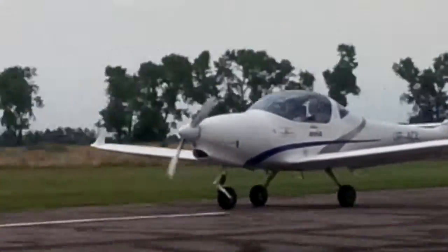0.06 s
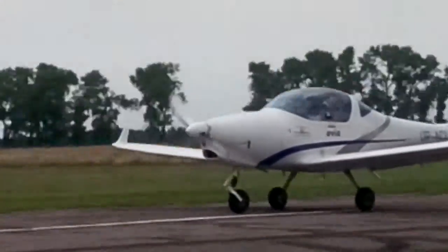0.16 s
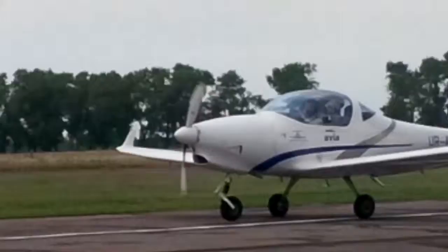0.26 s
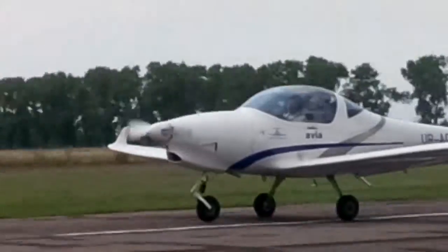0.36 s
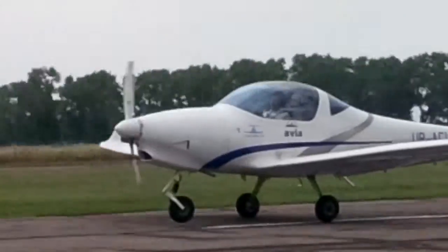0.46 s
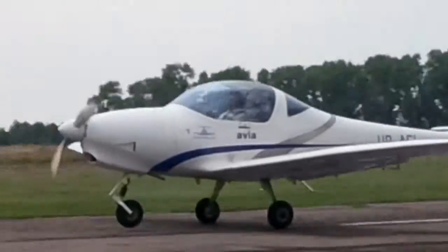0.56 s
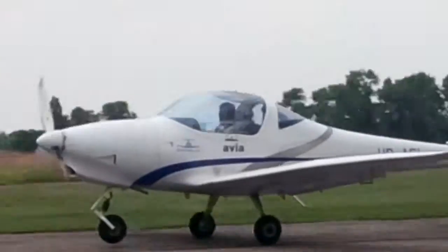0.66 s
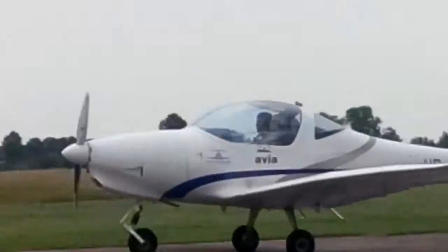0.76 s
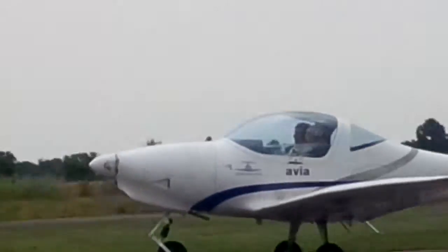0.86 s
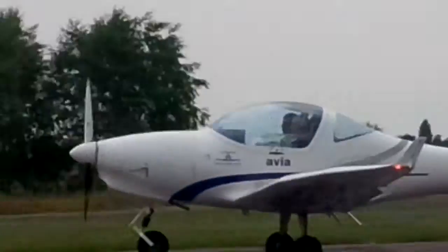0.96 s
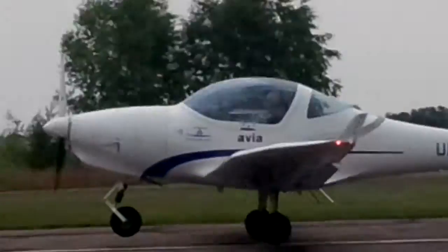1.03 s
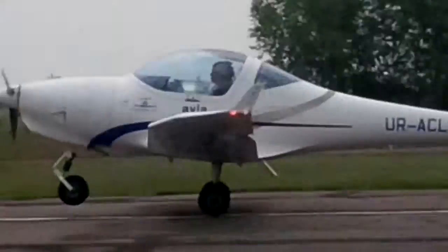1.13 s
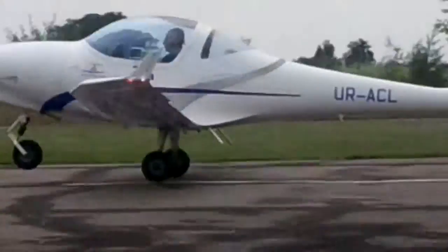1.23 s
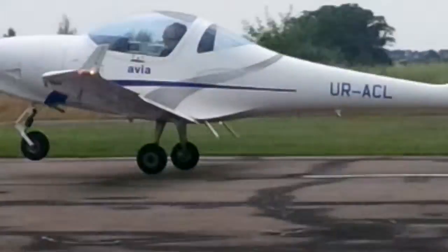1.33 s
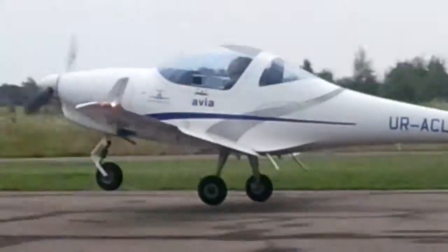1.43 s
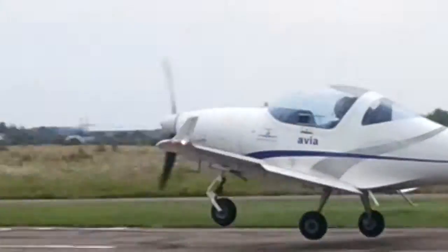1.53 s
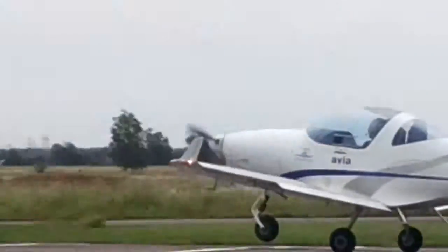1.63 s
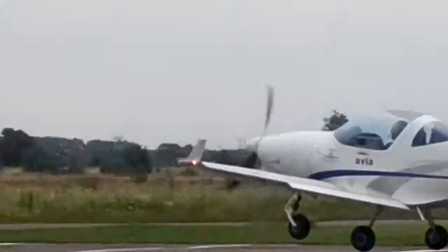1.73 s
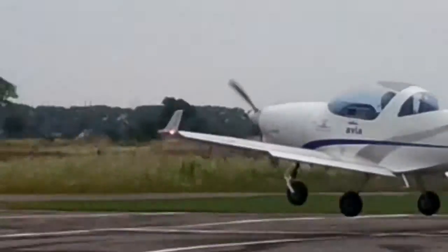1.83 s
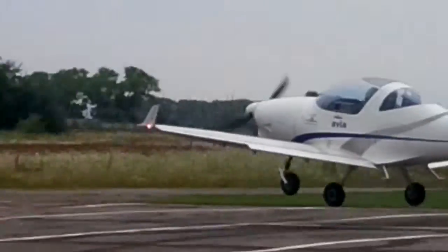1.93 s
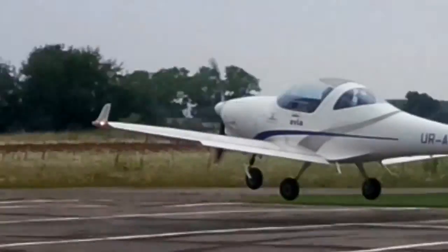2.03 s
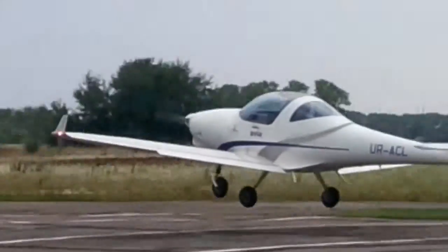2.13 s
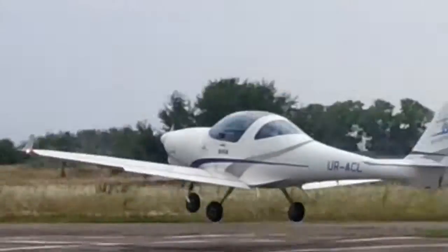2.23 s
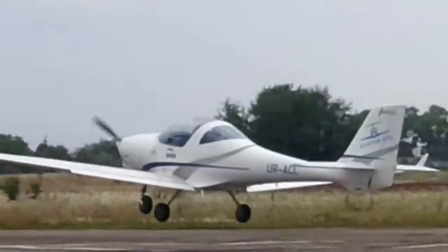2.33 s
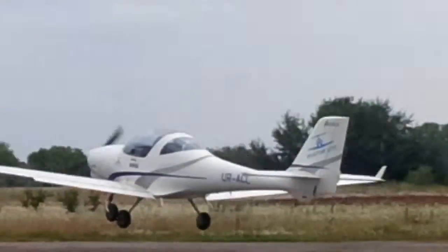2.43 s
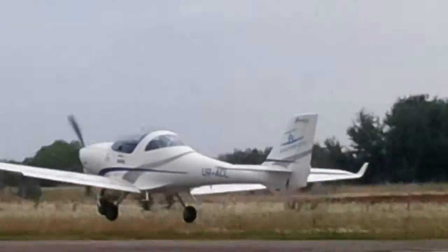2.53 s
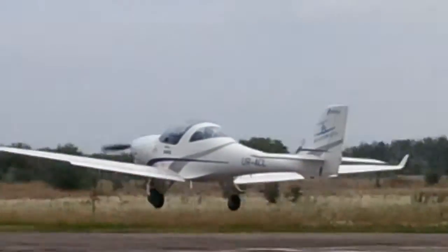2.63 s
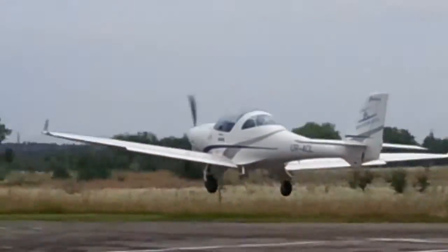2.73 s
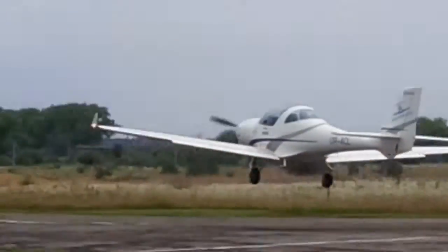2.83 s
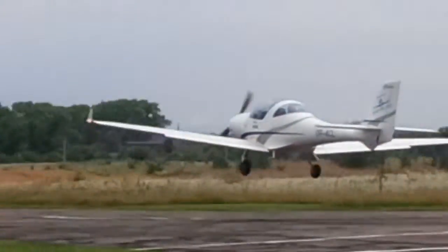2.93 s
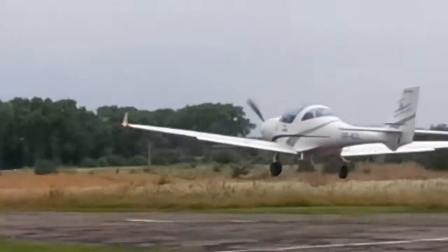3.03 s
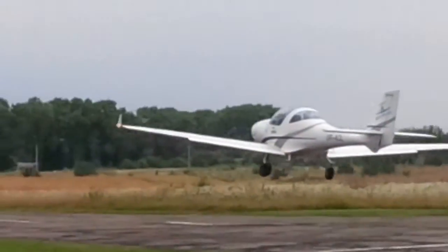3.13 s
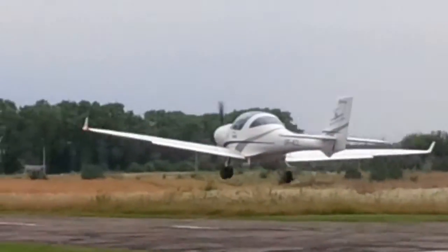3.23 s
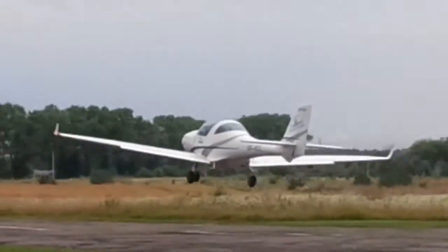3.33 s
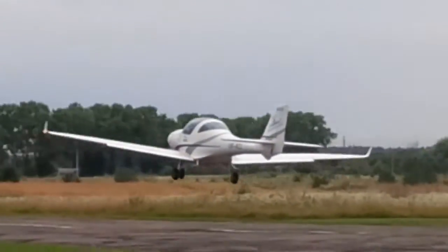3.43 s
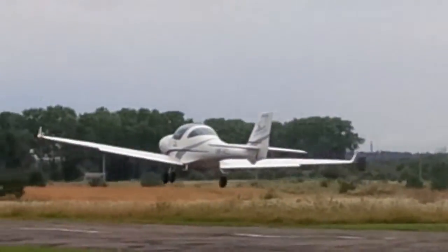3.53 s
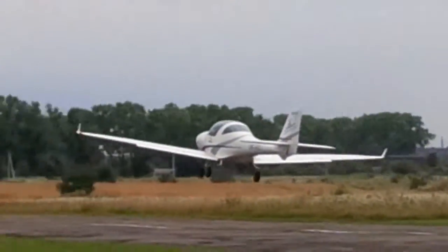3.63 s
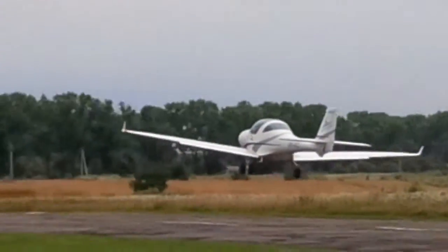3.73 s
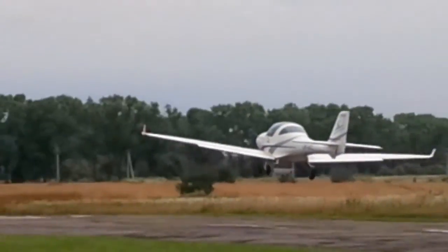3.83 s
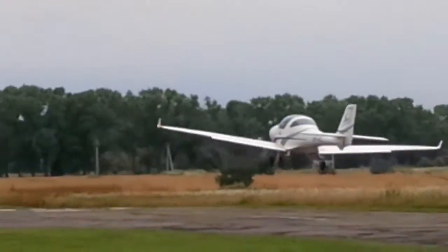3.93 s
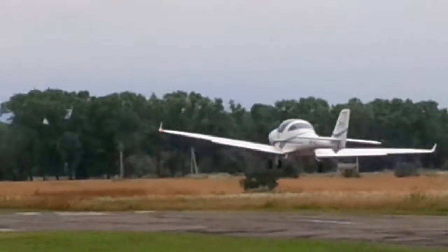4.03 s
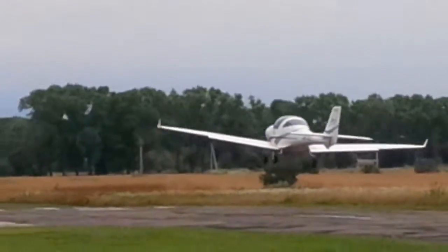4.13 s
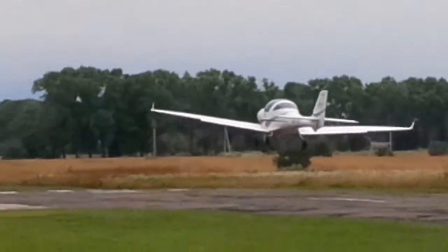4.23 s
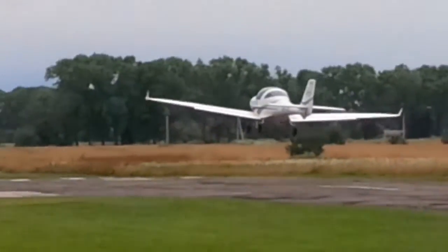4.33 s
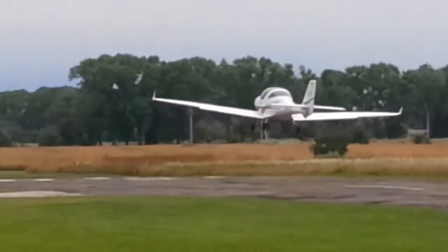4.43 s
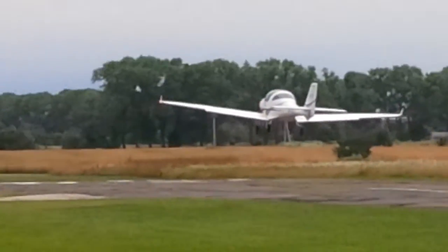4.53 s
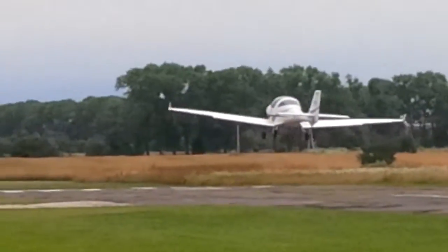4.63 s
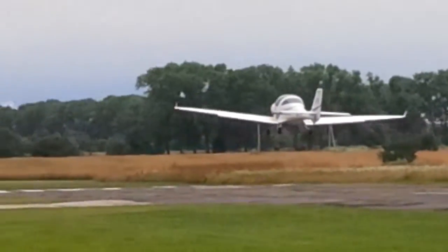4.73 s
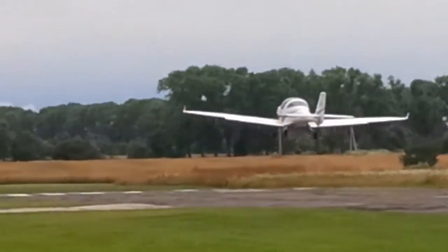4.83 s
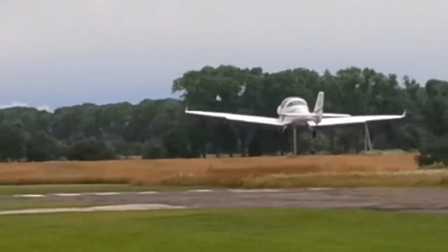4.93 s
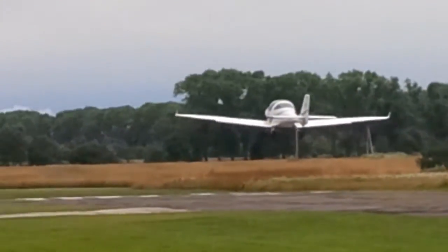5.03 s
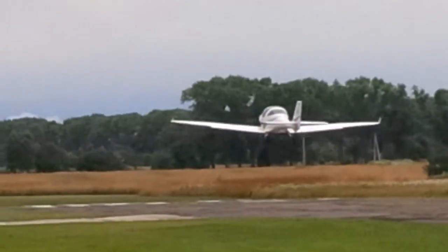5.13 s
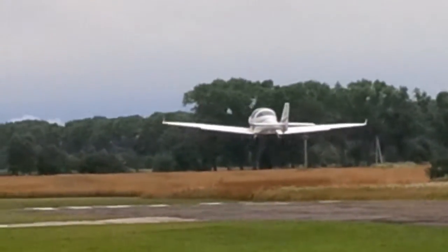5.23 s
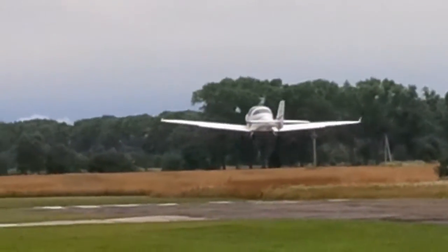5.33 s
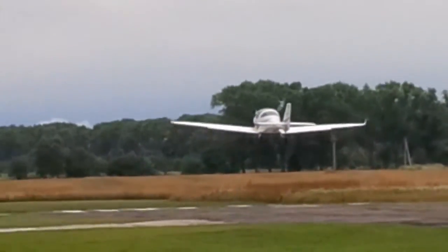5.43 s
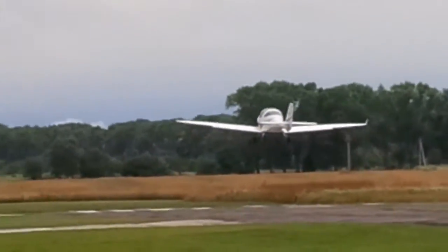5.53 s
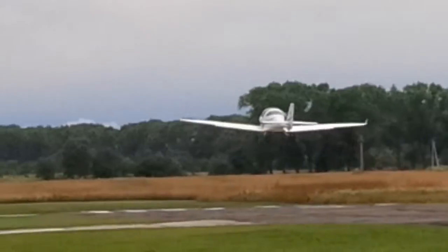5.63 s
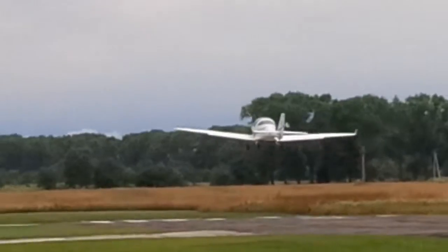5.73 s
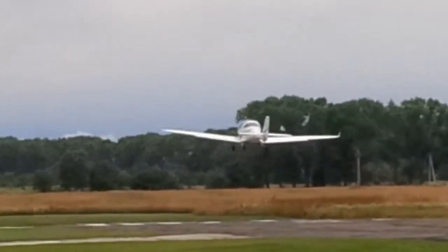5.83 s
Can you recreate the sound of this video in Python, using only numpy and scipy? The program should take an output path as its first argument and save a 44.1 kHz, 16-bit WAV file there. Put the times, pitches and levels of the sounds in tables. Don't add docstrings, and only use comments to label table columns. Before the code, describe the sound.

A light single-engine propeller plane is already loud at the start, sweeping past a hand-held camera on an open airfield. Its dense blade buzz and exhaust growl peak around one second, slide down in pitch, then fade steadily. Low wind buffets the microphone early on. Late in the distant drone come two dull finger taps, with a soft bird whistle between them.

```python
import sys
import numpy as np
from scipy import signal
from scipy.fft import rfft, irfft, next_fast_len
from scipy.io import wavfile
from scipy.ndimage import uniform_filter1d, map_coordinates

SR = 44100
rng = np.random.default_rng(int(sys.argv[2]) if len(sys.argv) > 2 else 0)


def invert_db(x):
    u = np.asarray(x, float) / 20
    return 10 ** u


def master_out(mix):
    frames = np.transpose(np.atleast_2d(mix))
    ceiling = np.clip(frames, -1, 1)
    pcm = np.round(ceiling * 32767).astype(np.int16)
    wavfile.write(sys.argv[1], SR, pcm)


N = 258867
SLOW_S = np.arange(0, N + 64, 64) / SR


def unit(x):
    return x / np.sqrt(np.mean(x ** 2) + 1e-20)


def along(points, hz):
    point_hz, values = np.transpose(points)
    return np.interp(np.log(hz + 1), np.log(point_hz + 1), values)


def curves(rows):
    seconds, *columns = np.transpose(rows)
    return [np.interp(np.arange(N) / SR, seconds, column) for column in columns]


def smooth(slow):
    return np.interp(np.arange(N) / SR, SLOW_S, slow)


def drift(rate):
    points = rng.standard_normal(int(N * rate / SR) + 4)
    return map_coordinates(points, [SLOW_S * rate])


def wobble(rate):
    return smooth(drift(rate))


def filtered(x, response):
    size = next_fast_len(N + 8192)
    hz = np.fft.rfftfreq(size, 1 / SR)
    return irfft(rfft(x, size) * response(hz), size)[..., :N]


def coloured(white, spectrum):
    return unit(filtered(white, lambda hz: invert_db(along(spectrum, hz))))


def noise(spectrum):
    return coloured(rng.standard_normal(N), spectrum)


def patchy(spectrum, patchy_db):
    z = signal.stft(rng.standard_normal(N), nperseg=128)[2]
    field = uniform_filter1d(rng.standard_normal(z.shape), size=2, axis=0)
    field = unit(uniform_filter1d(field, size=70, axis=1))
    patches = invert_db(np.resize(patchy_db, z.shape[1]) * field)
    white = signal.istft(z * patches, nperseg=128)[1][:N]
    return coloured(white, spectrum)


def rotation(hz):
    return 2 * np.pi * np.cumsum(hz) / SR


PASS_M = 24
CLEAR_M = 51


def flight():
    speed_m_per_s, abeam_s = 26, 1.35
    gone_m = speed_m_per_s * (SLOW_S - abeam_s)
    metres = np.hypot(gone_m, PASS_M)
    nose_deg = np.degrees(np.arctan2(PASS_M, -gone_m))
    return nose_deg, metres, -20 * np.log10(metres / PASS_M)


def beams(rows):
    deg, _, spread_db = flight()
    power = {}
    for order, aim, width, db in rows:
        beam_db = db - 6 * ((deg - aim) / width) ** 2
        power[order] = power.get(order, 0) + invert_db(beam_db) ** 2
    return {order: smooth(10 * np.log10(p + 1e-9) + spread_db) for order, p in power.items()}


def tone(angle, db, flutter_db):
    far_db_per_m = .012
    depth_db = flutter_db + far_db_per_m * (flight()[1] - PASS_M)
    return np.sqrt(2) * invert_db(db + smooth(depth_db * drift(14))) * np.cos(angle)


# time in seconds, engine cycles per second in Hz.
CYCLE_SPEED = [(0, 48.9), (.3, 48.65), (.6, 48), (.9, 47.2), (1.05, 46.78), (1.2, 46.24), (1.5, 45.12),
               (1.65, 44.68), (1.8, 44.32), (1.95, 44.05), (2.25, 43.68), (2.55, 43.27), (3, 43),
               (3.6, 42.8), (4.4, 42.58), (5, 42.44), (5.87, 42.4)]


def engine_cycles():
    return curves(CYCLE_SPEED)[0]


# time in seconds, hiss level in dB.
AIR_STRENGTH = [(0, -36), (.3, -33.5), (.8, -33.5), (1.5, -34), (1.87, -40.5), (2.5, -42), (2.9, -47),
                (3.5, -52), (3.7, -49), (3.9, -54.3), (4.12, -51), (4.34, -53), (4.5, -55), (4.75, -52.6),
                (4.92, -55.5), (5.2, -52.5), (5.43, -53), (5.87, -56.5)]
# level at full strength in dB, share of the strength changes,
# share of the spreading loss, loss in the air in dB per metre.
AIR_LAYERS = [
    (-26, 0.36, 1.2, 0.03),
    (-28.5, .33, 0.83, -0.0043),
    (-33, 1, 0.01, -0.02),
    (-34, 1.022, 0.011, 0.14),
]


def turbulence():
    full_db, faint_db, faint_sinks = -33, -58, 8.5
    _, metres, spread_db = flight()
    change_db = curves(AIR_STRENGTH)[0] - full_db
    beyond_m = np.maximum(metres - CLEAR_M, 0)
    levels_db = []
    for db, share, far, air in AIR_LAYERS:
        distance_db = smooth(far * spread_db - air * beyond_m)
        levels_db.append(db + share * change_db + distance_db)
    levels_db[3] += (faint_sinks - 1) * np.minimum(levels_db[3] - faint_db, 0)
    return levels_db


# multiple of the blade rate, angle from the nose in degrees,
# width in degrees to -6 dB, rms level in dB at the closest distance.
BLADE_BEAMS = [(1, 37, 8.5, -18), (1, 100.5, 29, -12), (1, 132.8, 23, -14.5), (2, 50.3, 14, -21),
               (2, 94.6, 31.5, -15.0), (2, 157.5, 10, -35.5), (3, 20, 100, -30), (3, 98, 31, -28),
               (3, 143, 10, -34.1), (4, 70.4, 5.5, -23), (4, 83.2, 17, -20), (4, 104, 57, -38),
               (5, 58.4, 12, -30.5), (5, 88, 21, -30), (5, 154, 9, -51)]
# multiple of the blade rate, level in dB above the mid roar.
TIP_TONES = [(6, -18), (7, -22), (9, -22), (10, -20), (11, -17), (12, -16), (13, -14), (14, -13), (15, -13),
             (16, -14), (17, -16), (18, -17), (19, -17), (20, -17), (21, -17), (22, -17), (23, -18),
             (24, -20)]


def propeller(mid_db):
    passes_per_cycle = 4 / 2.43
    levels = beams(BLADE_BEAMS)
    angle = rotation(passes_per_cycle * engine_cycles())
    skew = np.pi - .6
    strong = sum(tone(k * angle + skew, db, flutter_db=0.17 + 0.23 * k) for k, db in levels.items())
    abeam_db = np.clip(.8 * (levels[2] - mid_db - 9), -10, 3)
    ragged = angle + .02 * wobble(30)
    weak = sum(tone(k * ragged + skew, mid_db + abeam_db + db, flutter_db=1.8) for k, db in TIP_TONES)
    puff = invert_db(0.41 * wobble(60)) * np.exp(4 * (np.cos(angle - .3) - 1))
    return strong, weak, puff, invert_db(abeam_db)


# multiple of the engine cycle, angle from the nose in degrees,
# width in degrees to -6 dB, rms level in dB at the closest distance.
EXHAUST_BEAMS = [(4, 38, 23, -29), (4, 87, 4, -45), (4, 143.5, 21, -36.5), (6, 85, 20, -20.3),
                 (6, 113, 109, -31), (6, 154.2, 15.5, -27), (7, 75, 18, -23), (7, 109, 8, -33.5),
                 (7, 122, 122, -37.8), (8, 58.4, 15.5, -31), (8, 86, 40, -40.7), (8, 155.2, 11.5, -39.5),
                 (12, 20.3, 31.5, -23), (12, 86, 9, -33), (12, 150, 20, -46)]
# multiple of the engine cycle, angle from the nose in degrees,
# width in degrees to -6 dB, rms level in dB at the closest distance.
GEAR_WHINE = [(13.6, 86.5, 16, -34), (20.15, 119.6, 16, -37.5)]
# multiple of the engine cycle, level in dB above the mid roar.
ENGINE_TONES = [(1, -22), (2, -15), (3, -14.5), (5, -10), (9, -20), (10, -19), (11, -22.5), (15, -25),
                (16, -17.5), (18, -15), (19, -18.5), (20, -26), (21, -22), (22, -30), (23, -29), (24, -32)]


def engine(mid_db):
    angle = rotation(engine_cycles()) + 0.015 * wobble(25)
    start = rng.uniform(0, 2 * np.pi, size=32)
    exhaust, whine = beams(EXHAUST_BEAMS), beams(GEAR_WHINE)
    strong = sum(tone(k * angle + start[int(k)], db, flutter_db=0.75) for k, db in exhaust.items())
    strong = strong + sum(tone(k * angle, db, flutter_db=1.5) for k, db in whine.items())
    weak = sum(tone(k * angle + start[int(k)], mid_db + db, flutter_db=1.0) for k, db in ENGINE_TONES)
    return strong, weak


# frequency in Hz, level in dB per Hz.
RUMBLE_COLOUR = [(20, -34), (45, -11), (100, -4), (200, 2.5), (320, -1), (420, -9.5), (600, -19),
                 (900, -52), (1500, -130)]
ROAR_COLOUR = [(360, -27.5), (620, 0.5), (689, -3.5), (880, -2), (1210, 1.5), (1350, 0), (1650, 2),
               (1750, -1), (1980, -11), (2500, -11), (3250, -27), (5500, -120)]
HISS_COLOUR = [(1500, -60), (2000, -1), (2400, -2.5), (2900, -4), (3430, -8), (3830, -4), (4200, -9.5),
               (4800, -8), (5700, -10.5), (6270, -14), (6800, -12.5), (8000, -24), (9200, -38),
               (12900, -34), (13200, -120)]
TREBLE_COLOUR = [(4290, -19), (7300, -6.5), (11600, -2.5), (14700, -6.5), (15800, -12)]


def wake(puff, abeam, levels_db):
    swell = wobble(18)
    shimmer_db = .02 * flight()[1]
    # colour, puff depth, swell in dB, patches in dB
    layers = [(RUMBLE_COLOUR, .2, .6, 0), (ROAR_COLOUR, 1.1 * abeam, .2, 0),
              (HISS_COLOUR, .85, .5, 3), (TREBLE_COLOUR, 1.2, 1.3, 3.5)]
    total = 0
    for i, (colour, depth, swell_db, patchy_db) in enumerate(layers):
        is_hiss = i == 2
        steady = patchy(colour, shimmer_db) if is_hiss else noise(colour)
        puffed = patchy(colour, patchy_db) if patchy_db else noise(colour)
        rush = steady + 1.5 * depth * puff * puffed
        total = total + invert_db(levels_db[i] + swell_db * swell) * unit(rush)
    return total


def off_ground(x):
    runway_ms_m = 68.5
    climb_ms, settle_ms_m2 = 1.17, 400
    grass_s, handover_s = 2.1, .55
    metres = flight()[1]
    grass = smooth(np.clip((SLOW_S - grass_s) / handover_s, 0, 1))
    abeam_loss = 0.2 * (PASS_M / metres) ** 6
    scatter_loss = .004 * np.maximum(metres - CLEAR_M, 0)
    strength = smooth(0.52 - abeam_loss - scatter_loss)
    dull = filtered(x, lambda hz: 1 / np.sqrt(1 + (hz / 2600) ** 2))

    def late(ms):
        heard_at = np.arange(N) - smooth(ms) * SR / 1000
        return map_coordinates(dull, [heard_at], mode="nearest", order=1)

    runway_echo = late(runway_ms_m / metres)
    grass_echo = late(climb_ms + settle_ms_m2 / metres ** 2)
    echo = (1 - grass) * runway_echo + grass * grass_echo
    return (x + strength * echo) / np.sqrt(1 + strength ** 2)


def plane():
    levels_db = turbulence()
    mid_db = levels_db[1]
    fade_db = smooth(.06 * (flight()[1] - PASS_M))
    blades, tips, puff, abeam = propeller(mid_db)
    pipe, orders = engine(mid_db - fade_db)
    return blades + pipe + off_ground(tips + orders + wake(puff, abeam, levels_db))


# time in seconds, peak level in dB, half length in seconds.
WIND_GUSTS = [(0, -33, 0.027), (.17, -27.5, 0.077), (.34, -26, 0.042), (.45, -28, .07), (.88, -33, .025),
              (1.42, -41, .1), (2.1, -38, .03), (2.296, -40, 0.026), (2.836, -49, .05), (3.03, -52, .03),
              (3.508, -51, .04), (4.4, -61, .04), (5.458, -45, 0.028), (5.683, -43, .04),
              (5.78, -45, 0.036), (5.87, -47, 0.027)]


def gusts():
    breeze_db, lull_s, lull_db_per_s, calm_db = -41.5, 2.06, 14, -73
    dying_db = breeze_db - lull_db_per_s * np.maximum(SLOW_S - lull_s, 0)
    power = invert_db(np.maximum(dying_db, calm_db)) ** 2
    for s, db, half in WIND_GUSTS:
        power = power + invert_db(db - 6 * ((SLOW_S - s) / half) ** 2) ** 2
    return smooth(10 * np.log10(power))


# frequency in Hz, level in dB per Hz.
WIND_COLOUR = [(12, -22), (30, -4), (60, 1), (100, -3.5), (160, -5.5), (300, -11), (600, -26), (1500, -60),
               (3000, -130)]


def wind():
    shared = noise(WIND_COLOUR)
    pair = np.array([shared + .5 * noise(WIND_COLOUR), shared + .5 * noise(WIND_COLOUR)])
    return invert_db(gusts() + 4.0) * unit(pair * invert_db(2.0 * wobble(25)))


# time in seconds, peak level in dB, pitch in Hz,
# left minus right in dB, push or pull (sign and size).
FINGER_TAPS = [
    (4.5755, -28, 407, 14, -0.7),
    (5.2269, -22, 296, 5, 0.92),
]


def knocks():
    out = np.zeros((2, N + SR))
    t = np.arange(SR // 20) / SR
    for s, db, hz, pan_db, way in FINGER_TAPS:
        envelope = invert_db(-60 * t / 0.016) * (1 - np.exp(-t / 0.00023))
        tap = way * invert_db(db) * np.sin(2 * np.pi * hz * t) * envelope
        first = round(s * SR)
        out[:, first:first + len(t)] += tap * invert_db([[pan_db / 2], [-pan_db / 2]])
    return out[:, :N]


# time in seconds, pitch in Hz, level in dB.
BIRD_NOTE = [
    (5.06, 1120, -80),
    (5.08, 1122, -54),
    (5.19, 1115, -52),
    (5.23, 1110, -78),
]


def bird():
    hz, db = curves(BIRD_NOTE)
    return tone(rotation(hz), db, flutter_db=2)


# frequency in Hz, left minus right in dB.
CASE_SHADOW = [(60, .2), (140, .9), (400, .8), (820, 1.8), (1100, 4.5), (1470, 7.5), (1960, 6),
               (2500, -3.5), (3500, -1.5), (8000, .3), (15000, 1.5)]
# time in seconds, left minus right in dB.
PLANE_SIDE = [(0, -3.5), (.5, -3), (1, 0), (1.5, 1.7), (2, 2.2), (2.5, 1.8), (3, .4), (4, -.7), (5.87, -1)]
# frequency in Hz, share.
SIDE_SHARE = [(70, .15), (130, 1.54), (700, 0.83), (1300, 0.24), (2200, 2.24), (3500, 1.1), (12000, 0.88)]
# frequency in Hz, level in dB.
CASE_SCATTER = [(60, -40), (500, -22), (1400, -17), (2500, -15), (4000, -14), (9000, -10), (15000, -6)]


def ports(x):
    side = np.array([[.5], [-.5]])
    direct = filtered(x, lambda hz: invert_db(side * along(CASE_SHADOW, hz)))
    lean = invert_db(side * curves(PLANE_SIDE)[0]) - 1
    direct = direct + lean * filtered(direct, lambda hz: along(SIDE_SHARE, hz))
    t = np.arange(SR // 8) / SR
    spread = rng.standard_normal(len(t)) * invert_db(-60 * t / .3)
    diffuse = signal.fftconvolve(x, spread / np.linalg.norm(spread))[:N]
    return direct + 2 * side * filtered(diffuse, lambda hz: invert_db(along(CASE_SCATTER, hz)))


def scene():
    return ports(plane() + bird()) + wind() + knocks()


def roll_off(x):
    return signal.sosfilt(signal.butter(12, 15920, fs=SR, output="sos"), x)


def record(dry):
    eased = dry / (1 + np.abs(dry / .98) ** 5) ** (1 / 5)
    return roll_off(eased)


dry = scene()
out = record(dry)
master_out(out)
```